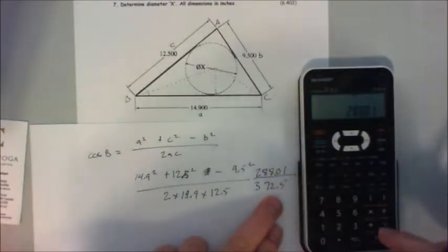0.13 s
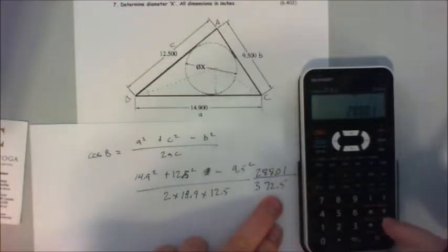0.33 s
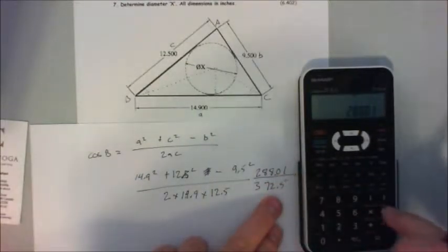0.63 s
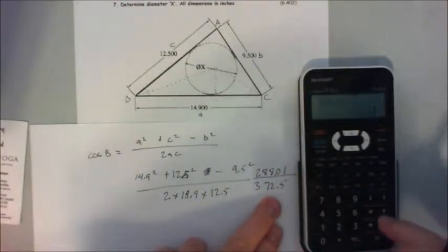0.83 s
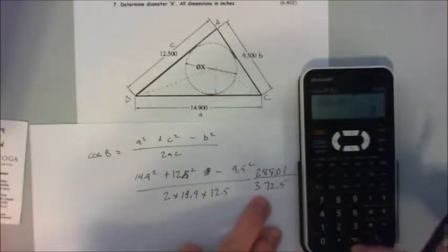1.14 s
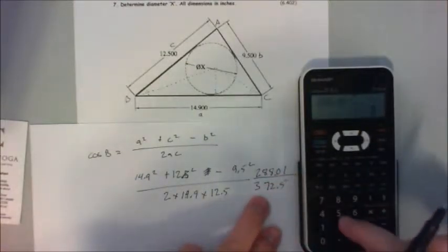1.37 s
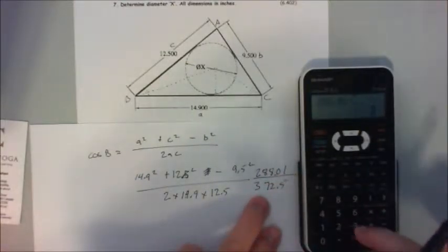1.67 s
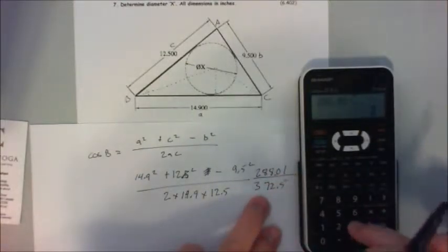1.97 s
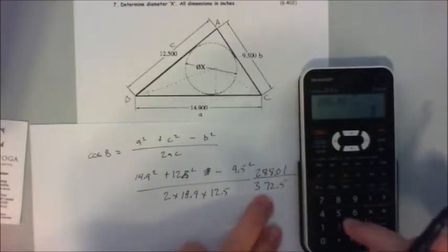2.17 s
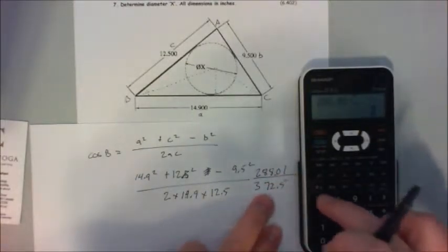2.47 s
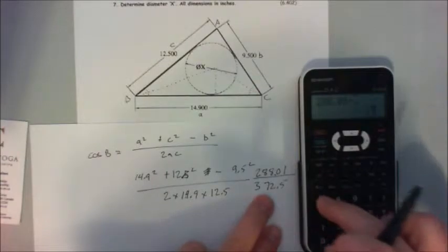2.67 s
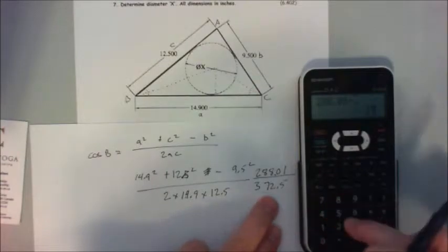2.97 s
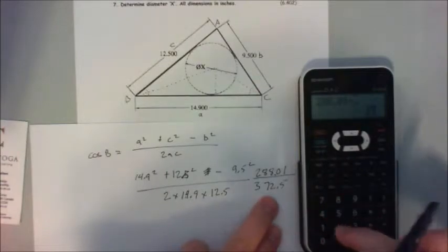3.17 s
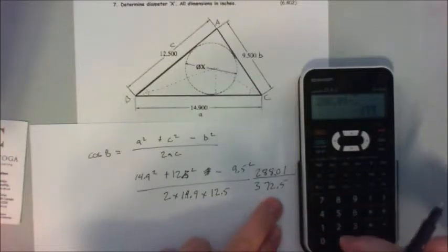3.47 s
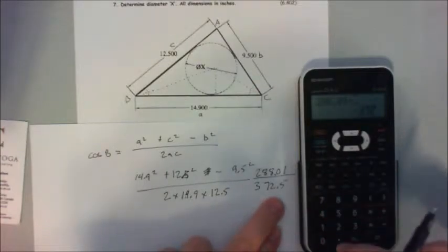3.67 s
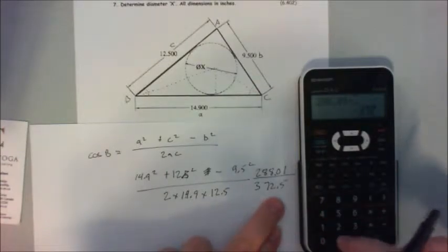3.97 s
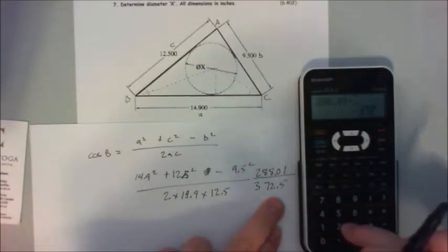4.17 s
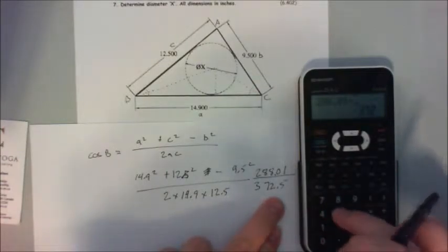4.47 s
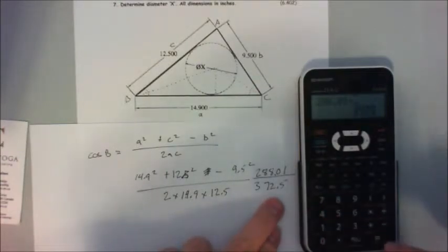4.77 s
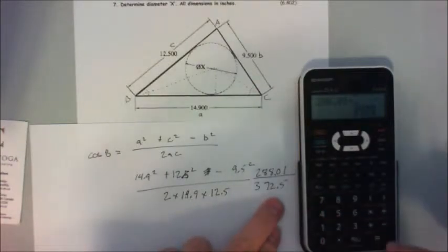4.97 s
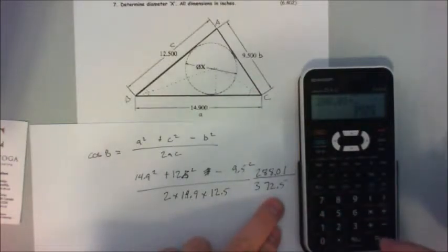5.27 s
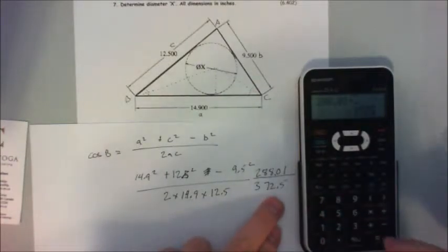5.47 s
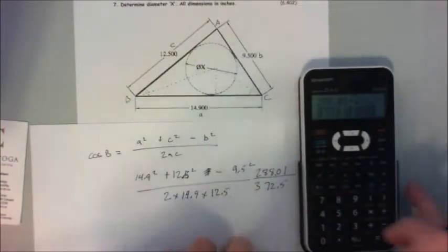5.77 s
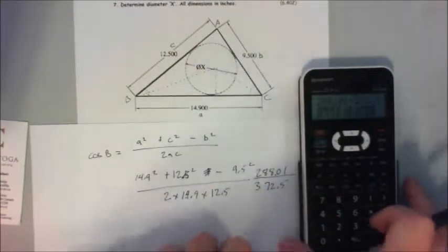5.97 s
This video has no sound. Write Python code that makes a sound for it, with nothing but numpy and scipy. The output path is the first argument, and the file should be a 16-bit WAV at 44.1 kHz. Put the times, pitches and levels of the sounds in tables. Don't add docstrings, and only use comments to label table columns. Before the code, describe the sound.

A finger presses calculator keys, one soft click then six firmer uneven snaps, each thumping the desk, over faint room hum, ending in paper rustle.

```python
import sys
import numpy as np
from scipy import signal
from scipy.fft import rfft, irfft, next_fast_len
from scipy.io import wavfile

SR = 44100
rng = np.random.default_rng(int(sys.argv[2]) if len(sys.argv) > 2 else 0)


def level_to_linear(level):
    exponent = np.asarray(level, float) / 20
    return 10 ** exponent


def wav_out(sig):
    wavfile.write(sys.argv[1], SR, np.round(np.clip(np.atleast_2d(sig).T, -1, 1) * 32767).astype(np.int16))


N = 269440


def rms_one(x):
    return x / np.sqrt(np.mean(x ** 2) + 1e-20)


def peak_at(x, level_db):
    return level_to_linear(level_db) * x / np.max(np.abs(x))


def band(x, low_hz, high_hz):
    return signal.sosfilt(signal.butter(2, [low_hz, high_hz], "band", fs=SR, output="sos"), x)


def band_noise(low_hz, high_hz):
    return rms_one(band(rng.standard_normal(N), low_hz, high_hz))


def coloured(spectrum, low_hz):
    size = next_fast_len(N)
    hz = np.fft.rfftfreq(size, 1 / SR)
    spectrum_hz, spectrum_db = np.transpose(spectrum)
    shape = level_to_linear(np.interp(np.log(hz + 1), np.log(spectrum_hz), spectrum_db))
    noise = irfft(shape * rfft(rng.standard_normal(size)), size)[:N]
    return noise / np.sqrt(2 * np.sum(shape[hz > low_hz] ** 2) / size)


def add(out, s, sound):
    at = round(s * SR)
    out[at:at + len(sound)] += sound[:N - at]


def struck(modes, spread_db, turn, crest_s, size):
    hz, level_db, t60 = np.transpose(modes)[:, :, None]
    t = np.arange(size) / SR
    strength, phase = rng.standard_normal((2, len(modes), 1))
    fading = level_to_linear(level_db + spread_db * strength - 60 * t / t60)
    return np.sum(fading * np.cos(2 * np.pi * hz * (t - crest_s) + turn * phase), axis=0)


# f/Hz, level/dB (per Hz)
AIR_SPECTRUM = [(12, 1.5), (20, -17.5), (27, -33), (45, -18), (68, -2.5), (98, -25.5), (137, -15.5),
                (202, -25), (266, -23), (382, -35.5), (452, -26.5), (534, -36.5), (686, -34.5),
                (2540, -44.5), (15500, -46.5)]
# f/Hz, width/Hz, level/dB (rms)
VENT_THROBS = [(59.379, 0.8097, -51), (30.096, 2.614, -54.5), (90.337, 3.33, -68.5)]


def air():
    out = level_to_linear(-59.5) * coloured(AIR_SPECTRUM, 141.71)
    for hz, width_hz, level_db in VENT_THROBS:
        throb = band(rng.standard_normal(N + SR), hz - width_hz / 2, hz + width_hz / 2)[SR:]
        out += level_to_linear(level_db) * rms_one(throb)
    whine_hz, whine_rms_db = 13171, -86
    return out + level_to_linear(whine_rms_db + 3) * np.sin(2 * np.pi * whine_hz * np.arange(N) / SR)


# t/s, snap level/dB, desk board level/dB, desk sway level/dB, first swing side/+-1
PRESSES = [(0.6409, -37, -32.5, -24, -1), (1.9007, -26.5, -20, -28.5, -1), (2.484, -19.5, -15, -48, -1),
           (3.1952, -21.5, -19.5, -30, 1), (3.821, -22.5, -23, -50, 1), (4.4577, -25, -18, -31.5, 1),
           (5.285, -17, -15, -27, 1)]
# tick t/s, tick level/dB, wait for the clack/ms, clack level/dB, desk level/dB
RELEASES = [(0.6958, -47, 25.2, -62, -53.5), (1.9631, -44, 10.747, -37, -29), (2.551, -35, 8.6, -34, -26),
            (3.2488, -44.5, 13.973, -47.5, -37), (3.8856, -48, 7.8, -35, -26.5),
            (4.5186, -46.5, 13.272, -33, -26.5), (5.323, -46, 32.5, -43.5, -46.5)]
# t/s, level/dB
SLIDES = [(.632, -41.5), (1.8995, -41), (3.818, -33.5), (5.2784, -30.5)]
# t/s, key cap level/dB, shell level/dB
TAPS = [(.722, -50.5, -65), (0.8288, -50.5, -44), (2.084, -45.5, -49.5), (2.095, -59.5, -43),
        (2.6841, -74, -48.5), (2.7676, -61, -54), (3.257, -46.5, -47.5), (3.3513, -55, -61.5),
        (3.483, -55.5, -51.5), (3.8802, -45.5, -41), (4.463, -32.5, -34.5), (5.36, -45, -51),
        (5.4095, -55, -53), (5.687, -56, -67), (5.7852, -55, -44), (5.3529, -45.5, -59.5),
        (5.8249, -53, -66), (5.9378, -66, -43.5), (5.9662, -55, -53), (5.9858, -39, -49.5),
        (6.0098, -40.5, -44.5)]
LANDING = (-7.5, -31, -31, -31.5, 8.5)
SNAP = (-0.18, -0.5, -5.5, -6.5, 3)
CRACK = (0.0819, -33, -8, -22.5, 3.6269)
SLIDE = (-0.5, -10.5, -2.5, -6.5, 9.5)
TICK = (-0.5, -5, 6, -11, 4)
SLIP = (-1.5, -25.5, -9.5, -9.5, 2)
CLACK = (1.0733, 0, -8, 3.5, 3)
REBOUND = (11, -19.5, -39, -10.5, 3.5)


def contacts():
    steps = [(s, db, SLIDE) for s, db in SLIDES]
    for s, snap_db, *_ in PRESSES:
        steps += [(s, snap_db, kind) for kind in (LANDING, SNAP, CRACK)]
    for s, tick_db, wait_ms, clack_db, _ in RELEASES:
        steps.append((s, tick_db, TICK))
        steps += [(s + wait_ms / 1000, clack_db, kind) for kind in (SLIP, CLACK, REBOUND)]
    rows = []
    for s, db, (lag_ms, case, cap, shell, chatter_ms) in steps:
        rows.append((s + lag_ms / 1000, db + case, db + cap, db + shell, chatter_ms))
    return rows + [(s, cap_db - 9, cap_db, shell_db, 3.447) for s, cap_db, shell_db in TAPS]


# f/Hz, level/dB, time to fade by 60 dB/s
CASE = [(1600, -11, .014), (2020, -3, .012), (2290, -2, .014), (2470, 0, .017), (2800, -5, .009),
        (3120, -5, .009)]
# f/Hz, level/dB, time to fade by 60 dB/s
KEY_CAP = [(3370, 0, .01), (3830, -3, .008), (4340, 0, .009), (4800, -1, .008), (5400, -5, .005),
           (5850, -6, .005), (6450, -6, .005), (7000, -7, .005), (7740, -4, .006), (8420, -7, .004),
           (9200, -10, .004), (10000, -11, .004), (10800, -13, .003), (12100, -16, .003),
           (14000, -22, .003)]
# f/Hz, level/dB, time to fade by 60 dB/s
SHELL = [(459.95, -7.5, 0.273), (505.94, -3.5, 0.11934), (664.22, 1, 0.06908), (730.7, -20.5, 0.0607),
         (797.82, -7.5, 0.07805), (842.6, -4, 0.019), (960.72, 6, 0.02046), (1098.5, -6.5, 0.062),
         (1127.5, -8, 0.07)]


def keys():
    stutter_ms, contact_hz = .43, 15910
    shell_feels_ms = 1.8445
    crest_s = .0001
    out, t_ms = np.zeros(N), np.arange(900) * 1000 / SR
    knock_at = np.arange(30) * stutter_ms * SR / 1000
    soft = np.exp(-2 * np.pi * contact_hz / SR)
    for s, case_db, cap_db, shell_db, chatter_ms in contacts():
        phase = t_ms * 1.4295 / chatter_ms + 0.03673
        swell = phase * np.exp(-phase ** 2)
        force = rng.standard_normal(900)
        force[(knock_at + rng.uniform(0, 7, 30)).astype(int)] = rng.uniform(2, 5, 30)
        force = signal.lfilter([1 - soft], [1, -soft], swell * force)
        heart = force * np.exp(-((t_ms - 0.3366 * chatter_ms) / shell_feels_ms) ** 2)
        parts = ((CASE, case_db, force), (KEY_CAP, cap_db + 2.5, force), (SHELL, shell_db + 2, heart))
        for modes, level_db, drive in parts:
            ringing = struck(modes, spread_db=1.2, turn=1.0, crest_s=crest_s, size=5000)
            add(out, s + crest_s, peak_at(signal.fftconvolve(drive, ringing), level_db))
    return out


# low f/Hz, high f/Hz, time to fade by 60 dB/s, level/dB
ROOM = [(285.74, 755.56, 0.10924, -10), (1628.5, 3166.6, 0.15408, -14.5), (3386.5, 9560, 0.09951, -15),
        (6107, 7272, 0.01516, -12.5), (10185, 10200, .09, -30)]


def room(x):
    out = np.zeros(N)
    for low_hz, high_hz, t60, level_db in ROOM:
        keep = level_to_linear(-120 / (t60 * SR))
        stored = signal.lfilter([.01], [1, -keep], band(x, low_hz, high_hz) ** 2 + 1e-18)
        out += level_to_linear(level_db) * np.sqrt(stored) * band_noise(low_hz, high_hz)
    return out


# t/s, board level/dB, first swing side/+-1
THUDS = [(.832, -40.5, -1), (1.043, -30, -1), (1.072, -34.5, 1), (1.091, -36.5, -1), (1.112, -39, -1),
         (2.083, -23.5, -1), (2.734, -45, -1), (3.348, -32.5, 1), (3.482, -40, -1), (5.358, -29, -1),
         (5.594, -44, -1), (6.008, -38.5, -1), (6.081, -46.5, -1)]
# t/s, panel level/dB, first swing side/+-1
RAPS = [(1.044, -42, 1), (1.078, -46, 1), (1.114, -43.5, -1), (2.085, -43.5, 1), (5.744, -36, 1),
        (5.783, -24.5, 1), (5.94, -36, -1), (5.989, -29.5, -1), (5.997, -37, -1), (6.01, -32, -1)]
# t/s, sway level/dB, panel level/dB, first swing side/+-1
SHIFTS = [(2.683, -33.5, -49, 1), (5.7432, -24, -36, -1), (5.763, -35, -39, 1), (5.782, -31, -34.5, -1),
          (5.795, -32, -53.5, -1), (5.813, -38, -41, -1), (5.832, -26, -39.5, 1), (5.848, -36, -51, 1),
          (5.937, -39, -47.5, -1), (5.985, -36, -46.5, -1), (5.994, -37, -59, -1)]
# lag/ms, then board, sway and panel level/dB,
# build-up/ms, damping by the resting hand/(dB/s)
PRESS_PUSH = (-0.9245, -0.5, 1, -11, 11, 2.5)
RELEASE_PUSH = (0.6133, -8, -0.5, -11.5, 12, 29)
THUD_PUSH = (-1, -1, -8, -15.5, 12, 147)
RAP_PUSH = (0.5, -5, -15, -2.5, 3, 502)
SHIFT_PUSH = (1.5, -14.5, 1.5, 2, 8, 100.5)


def pushes():
    steps = [(s, board, sway, board, side, PRESS_PUSH) for s, _, board, sway, side in PRESSES]
    steps += [(s + wait_ms / 1000, db, db, db, -1, RELEASE_PUSH) for s, _, wait_ms, _, db in RELEASES]
    steps += [(s, db, db, db, side, THUD_PUSH) for s, db, side in THUDS]
    steps += [(s, db, db, db, side, RAP_PUSH) for s, db, side in RAPS]
    steps += [(s, sway, sway, panel, side, SHIFT_PUSH) for s, sway, panel, side in SHIFTS]
    rows = []
    for s, board, sway, panel, side, kind in steps:
        lag_ms, more_board, more_sway, more_panel, build_ms, damping = kind
        levels = (board + more_board, sway + more_sway, panel + more_panel)
        rows.append((s + lag_ms / 1000, *levels, build_ms, damping, side))
    return rows


# f/Hz, level/dB, time to fade by 60 dB/s
BOARD = [(144.8, 4, 0.23), (119.07, 10.5, 0.0715), (156.24, -12, 0.63)]
# f/Hz, level/dB, time to fade by 60 dB/s
SWAY = [(62.878, -1, 0.3319), (77.517, 7, 0.159), (105.34, 0, 0.27086)]
# f/Hz, level/dB, time to fade by 60 dB/s
PANEL = [(194.27, 3, 0.3068), (259.4, 12.5, 0.1626), (286.12, 1.5, 0.08622), (350.54, -13.5, 0.1962),
         (435.16, -1.5, 0.05883)]


def desk():
    size = SR // 3
    out, t_ms = np.zeros(N), np.arange(size) * 1000 / SR
    for s, board_db, sway_db, panel_db, build_ms, damping, side in pushes():
        build_up = 1 - np.exp(-(t_ms * 1.3 / build_ms) ** 2)
        swell = side * level_to_linear(-damping * t_ms / 1000) * build_up
        for modes, level_db in ((BOARD, board_db), (SWAY, sway_db + 1.5), (PANEL, panel_db + 3.5)):
            ringing = struck(modes, spread_db=1.5, turn=.3, crest_s=build_ms / 1000, size=size)
            add(out, s, peak_at(swell * ringing, level_db))
    return out


# f/Hz, level/dB (per Hz)
PAPER = [(700, -25), (1100, -9), (1450, -10), (1900, 2), (2400, -6), (3300, -11), (4400, -1), (5000, -8),
         (5800, -4), (6800, -11), (8000, -7), (11000, -12), (13000, -17), (15500, -26)]
# t/s, length/s, rustle level/dB, desk drag level/dB, fall over the stroke/dB
STROKES = [(0.83, 0.05059, -58, -51.5, 20), (0.877, 0.15478, -69, -72.5, -2.5),
           (1.036, 0.09132, -62.5, -54.5, 8), (2.684, 0.05807, -55, -53.5, 19.5),
           (2.763, 0.0524, -74.5, -62.5, 0), (3.348, 0.0765, -59.5, -52.5, 24.5),
           (5.451, 0.06723, -64, -59, 8), (5.508, 0.1065, -59, -60.5, 9.5),
           (5.584, 0.08236, -63, -58, 11.5), (5.662, 0.0806, -67, -73, -9),
           (5.745, 0.034906, -42, -44.5, 11.5), (5.779, 0.1304, -46.5, -44.5, 21),
           (5.902, 0.11183, -62, -59, -9.5), (5.982, 0.05683, -50.5, -39.5, 12.5),
           (6.034, 0.0927, -60, -54.5, 1.5)]


def hand():
    attack_s, release_s = 0.002925, 0.01202
    t, rustle, drag = np.arange(N) / SR, np.zeros(N), np.zeros(N)
    for s, length, rustle_db, drag_db, fall_db in STROKES:
        rise, fade = (t - s) / attack_s, (s + length - t) / release_s + .5
        progress = np.clip((t - s) / length, 0, 1)
        stroke = np.clip(np.minimum(rise, fade), 0, 1) * level_to_linear(-fall_db * progress)
        rustle += level_to_linear(rustle_db) * stroke
        drag += level_to_linear(drag_db) * stroke
    grain = level_to_linear(2.9356 * band_noise(47.86, 1267.7) + 0.9358 * band_noise(37.16, 137.94))
    bright = rms_one(grain * coloured(PAPER, 1500))
    dull = rms_one(grain * band_noise(300, 750))
    return rustle * bright + drag * dull


def scene():
    clicks = keys()
    return (air() + clicks + room(clicks) + desk() + hand())[None]


def band_limit(x):
    return signal.sosfilt(signal.butter(12, 16650, fs=SR, output="sos"), x)


def record(dry):
    cut = signal.sosfilt(signal.cheby2(16, 50, 16350, fs=SR, output="sos"), dry)
    mix = cut - .0058
    return band_limit(mix)


dry = scene()
out = record(dry)
wav_out(out)
```